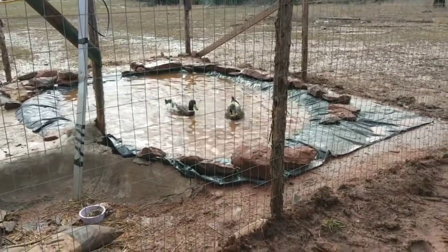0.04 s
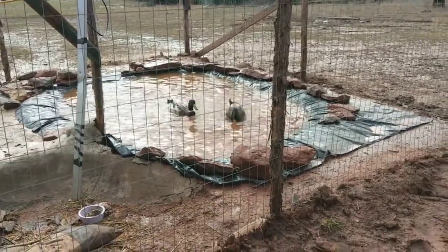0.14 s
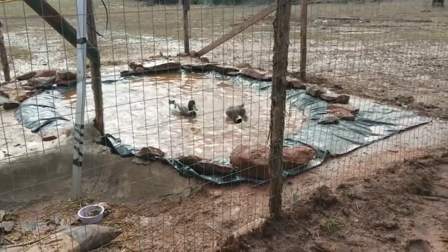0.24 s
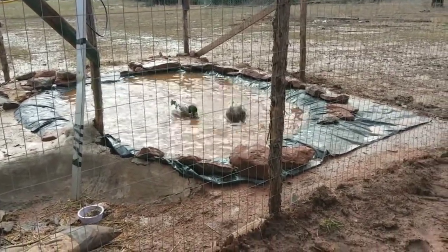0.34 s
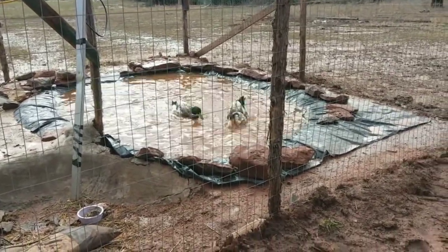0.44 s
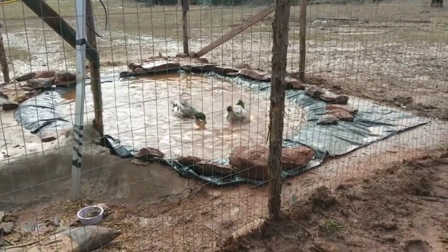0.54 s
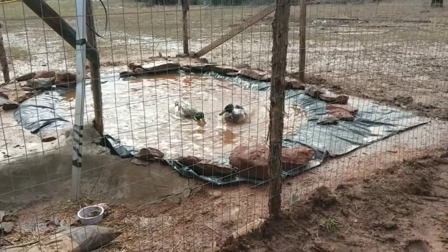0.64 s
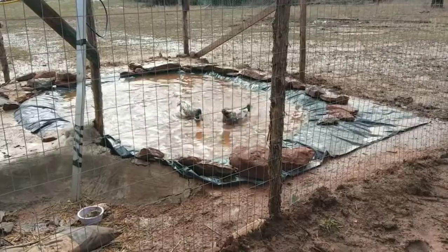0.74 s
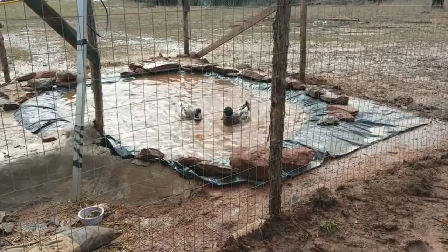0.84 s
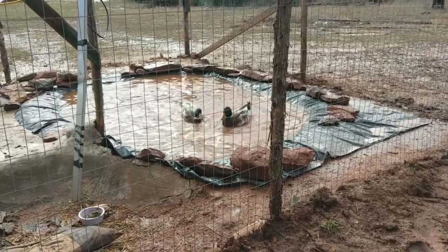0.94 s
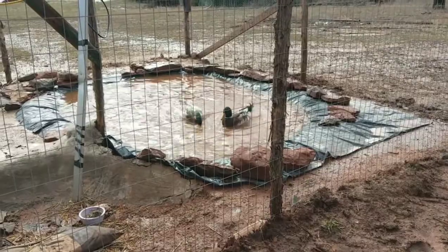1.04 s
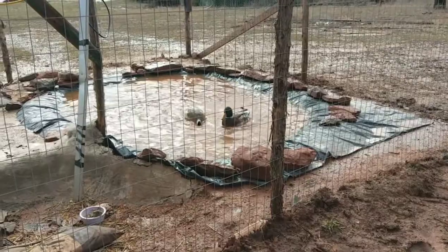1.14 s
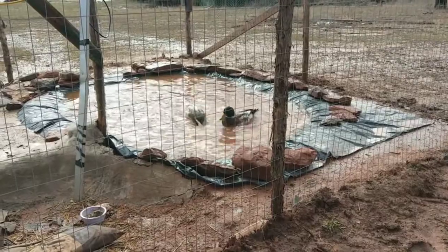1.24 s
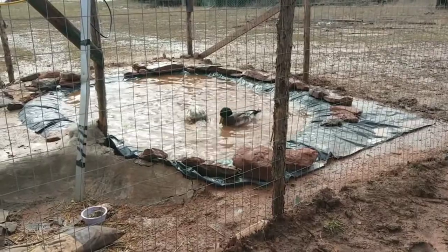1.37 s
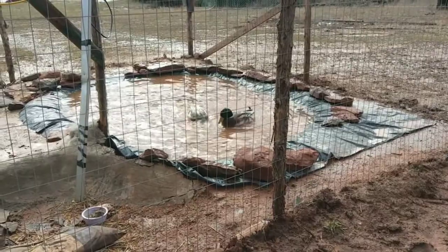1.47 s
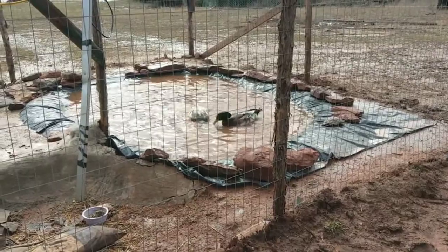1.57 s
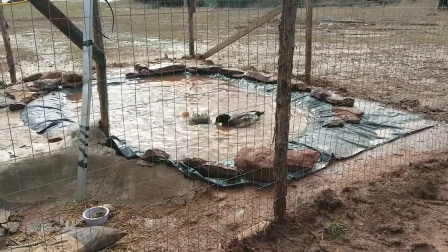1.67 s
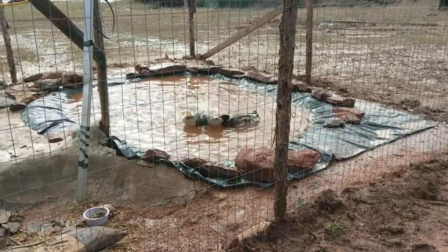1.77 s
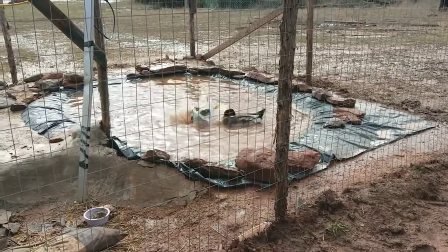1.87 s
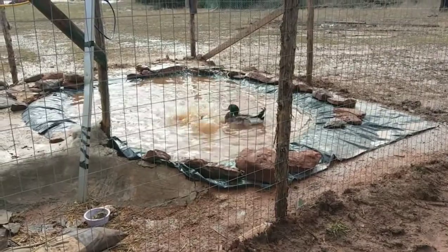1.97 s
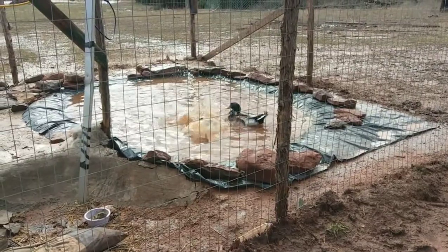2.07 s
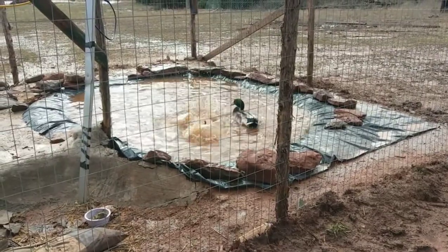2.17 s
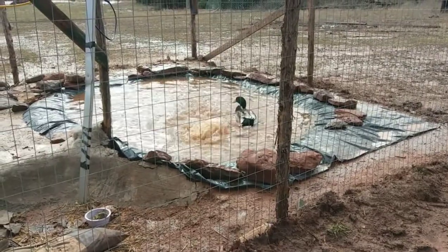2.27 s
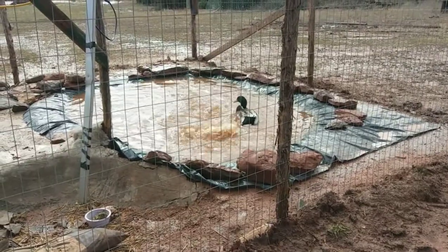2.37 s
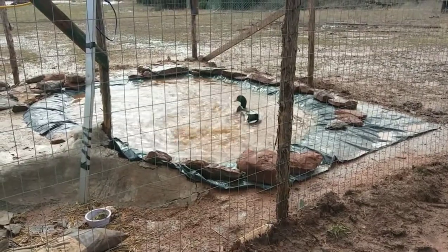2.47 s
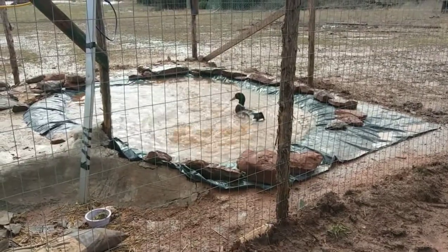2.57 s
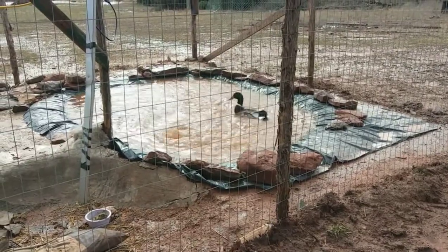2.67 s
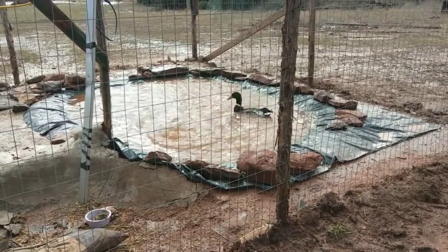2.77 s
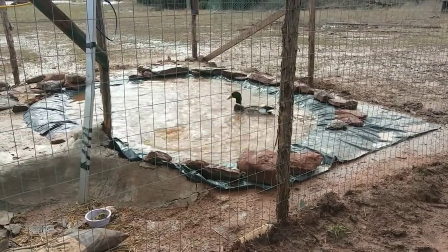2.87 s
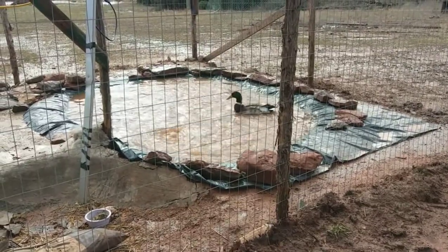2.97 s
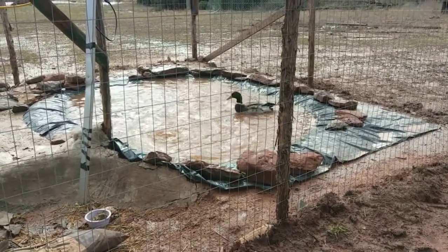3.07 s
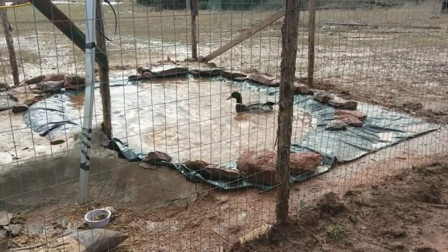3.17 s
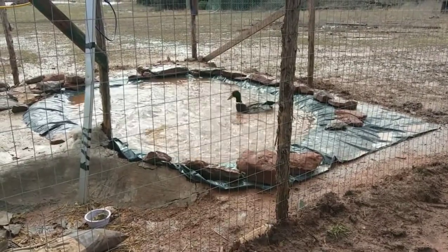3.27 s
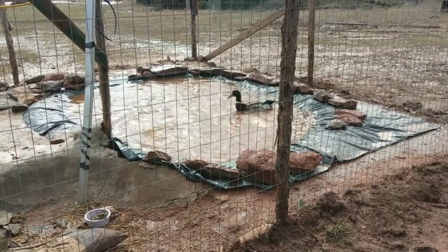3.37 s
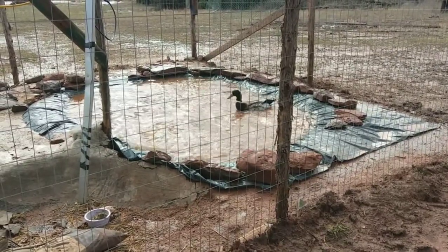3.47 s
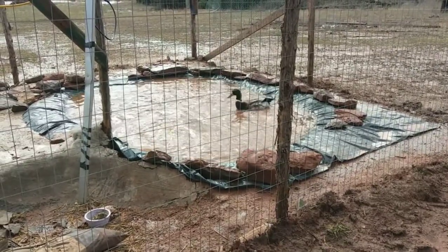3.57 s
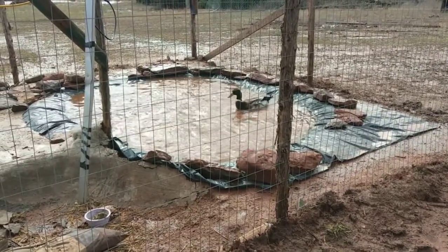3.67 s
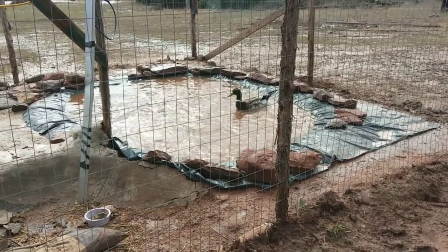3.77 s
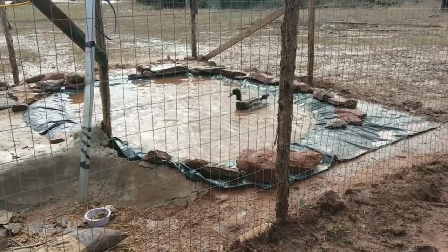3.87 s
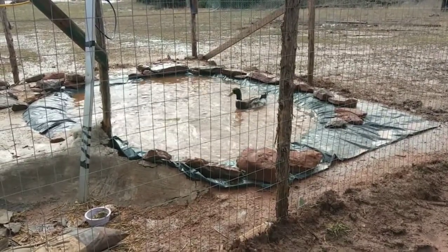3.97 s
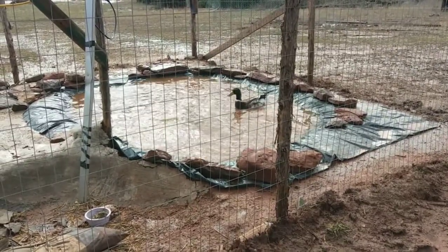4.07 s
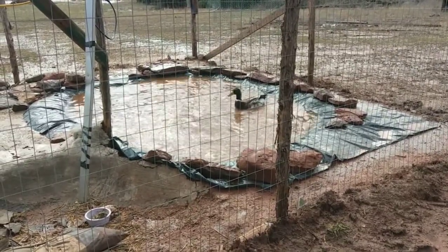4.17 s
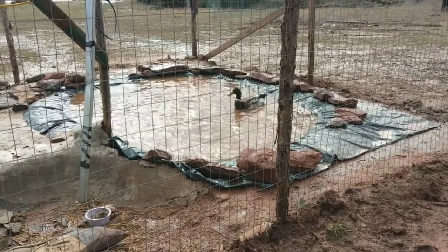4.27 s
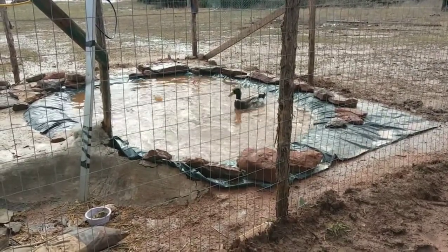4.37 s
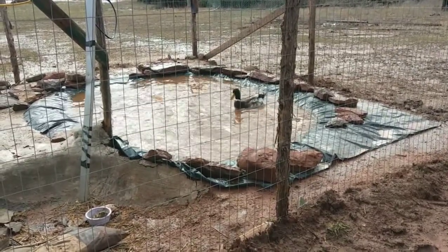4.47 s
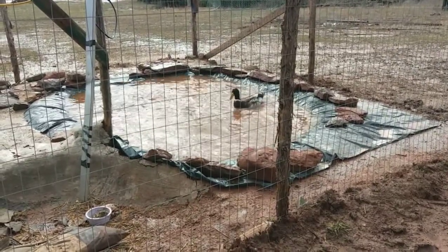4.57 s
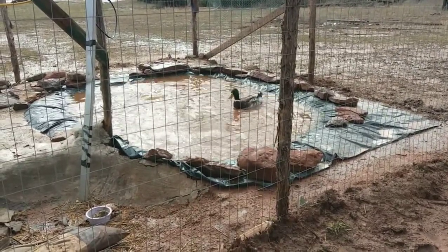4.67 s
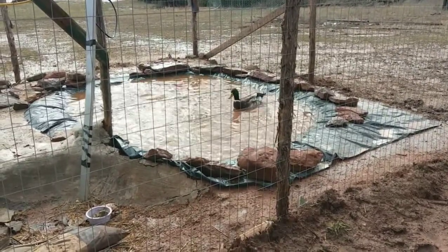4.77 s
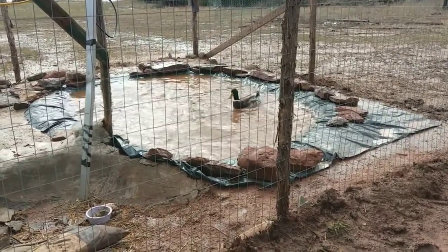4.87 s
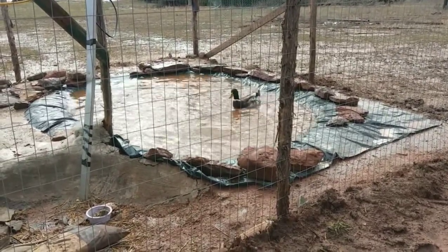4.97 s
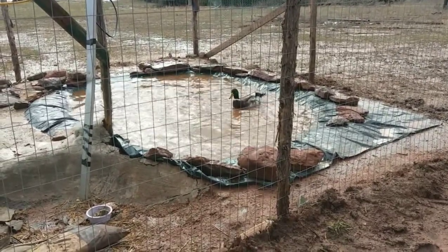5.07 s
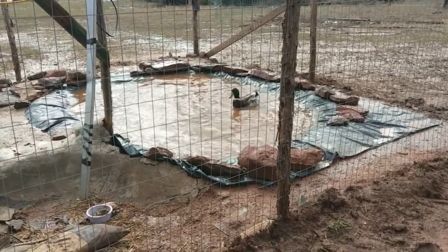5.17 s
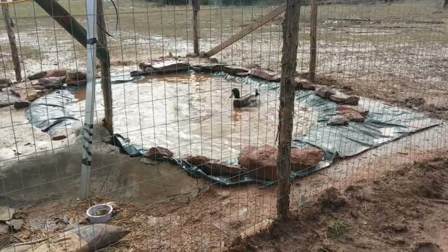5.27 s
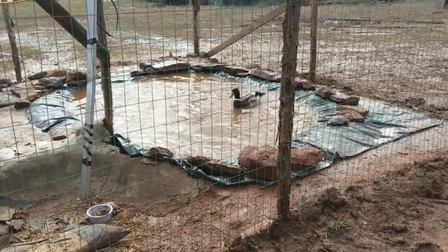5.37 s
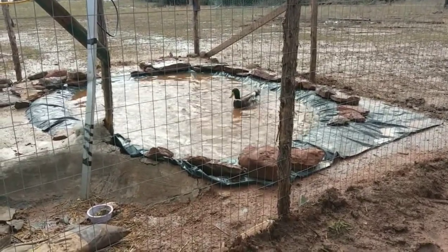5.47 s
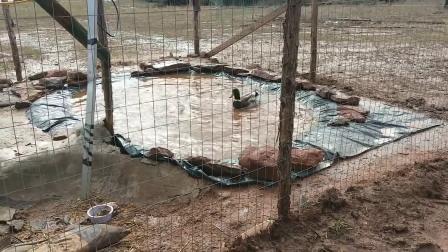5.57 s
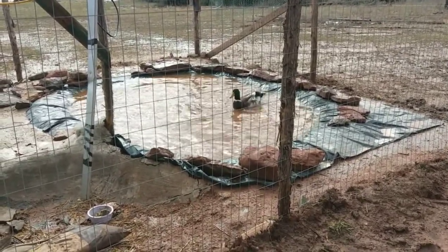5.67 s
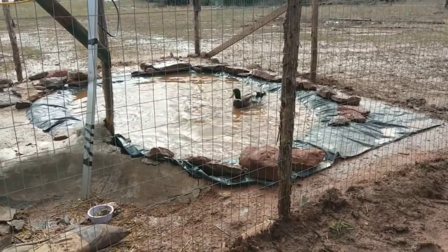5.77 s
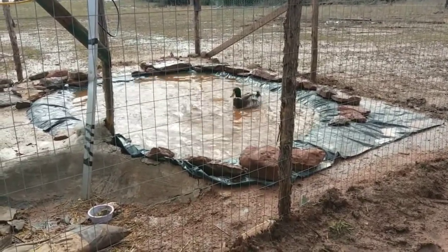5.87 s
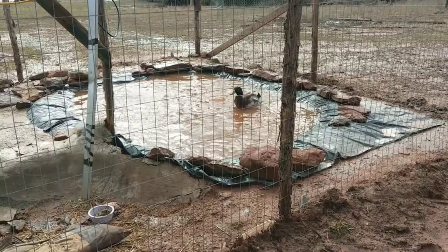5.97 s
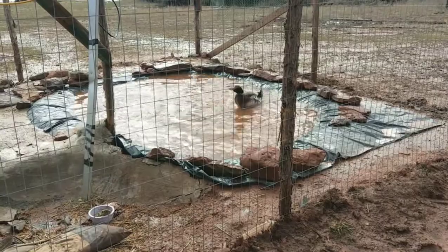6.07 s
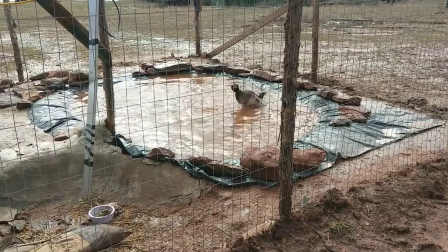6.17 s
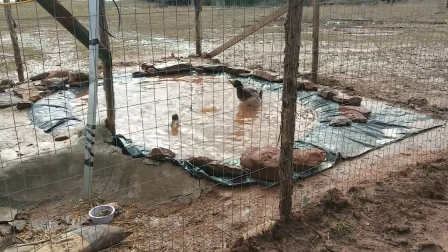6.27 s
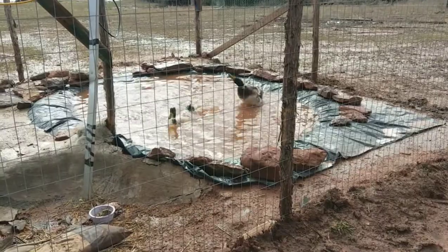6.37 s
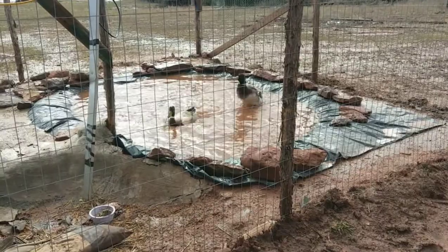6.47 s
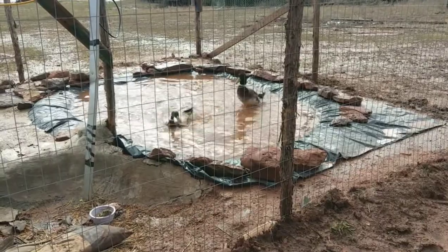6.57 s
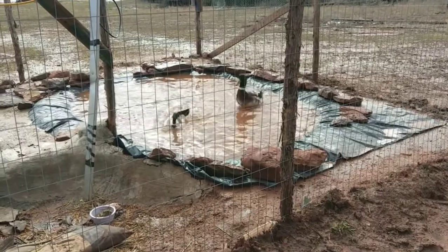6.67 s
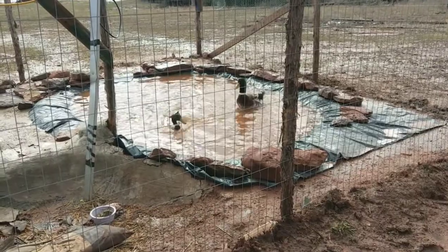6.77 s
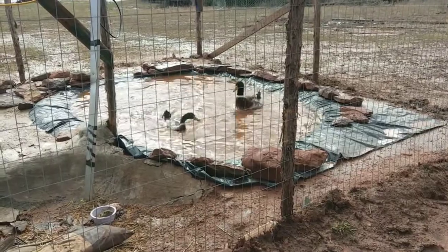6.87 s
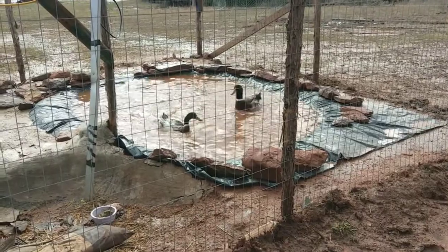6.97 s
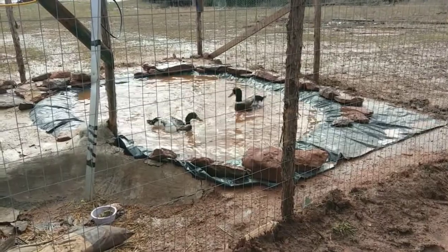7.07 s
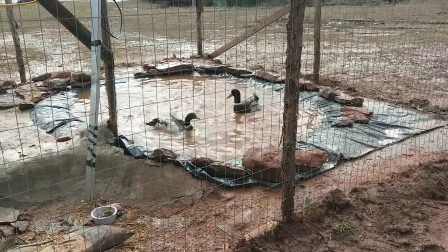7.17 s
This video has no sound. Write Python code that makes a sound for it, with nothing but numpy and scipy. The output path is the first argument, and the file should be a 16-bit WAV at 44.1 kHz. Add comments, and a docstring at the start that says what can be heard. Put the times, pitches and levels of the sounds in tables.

```python
"""Two drakes on a muddy pond

A few metres off, drakes call with raspy quacks and soft clucks: syrinx pulses and puffs ringing a throat.
One dives in a burst of wing slaps, churn and spray made of noise and bubble clouds, then surfaces.
Drips, plops and gurgles, as single bubbles and short noise bursts, fill the time between.
Wind, as low noise, bumps the microphone mostly at first, and a far bird whistles in gliding sines."""
import sys
import numpy as np
from scipy import signal
from scipy.fft import rfft, irfft, next_fast_len
from scipy.io import wavfile
from scipy.ndimage import uniform_filter1d, map_coordinates

SR = 44100
rng = np.random.default_rng(int(sys.argv[2]) if len(sys.argv) > 2 else 0)


def generate_wav(signal):
    """Clip the signal to [-1, 1] and save it as 16-bit WAV at the path in sys.argv[1]."""
    frames = np.transpose(np.atleast_2d(signal))
    scaled = np.clip(frames, -1, 1) * 32767
    pcm = np.round(scaled).astype(np.int16)
    wavfile.write(sys.argv[1], SR, pcm)


N = 319284  # length in samples

# Hush of the open field. Each row: frequency in Hz, relative density in dB per Hz.
AIR = [(60, -2.5), (110, -13.5), (180, -6), (320, -9), (500, -10), (820, -12), (1500, -17), (2200, -19),
       (3200, -25), (4800, -25), (7000, -28), (9200, -30.5), (11000, -29), (14400, -31.5)]
AIR_DB = -67
# Left-right likeness of the field. Each row: frequency in Hz, likeness (1 is identical).
AIR_ALIKE = [(100, 1), (700, 0.46), (2000, 0.11), (5000, 0.027), (12000, 0.084)]
# Breeze at the microphone, mostly dying down. Each row: time in seconds, level in dB.
WIND = [(0, -49.5), (.6, -57), (1.3, -53), (2.1, -53), (3.0, -56.5), (4.5, -64), (6.6, -64.5), (7.24, -60)]
# Wind rumble spectrum. Each row: frequency in Hz, relative density in dB per Hz.
RUMBLE = [(10, -1), (25, -2), (50, -3), (100, -10.5), (170, -20), (280, -28), (500, -36.5), (1200, -67)]
# Gusts on the microphone ports. Each row: start in seconds, half length in seconds, rumble level in dB,
# nominal peak of the sharp eddy in dB, left minus right in dB.
GUSTS = [(.009, 0.066, -46, -36.5, 10.5), (0.062, .09, -54, -40, 10), (0.15, 0.072, -43, -26.5, 6.5),
         (0.831, 0.059, -45, -37, -7.5), (0.894, .04, -43.5, -27.5, -8.5), (1.052, 0.074, -45, -29, 0),
         (1.113, 0.075, -45.5, -35, 0), (1.376, 0.019, -57, -35.5, -10), (1.696, 0.082, -50.5, -39, 4),
         (1.768, 0.046, -45.5, -35.5, 5), (1.893, 0.017, -48.5, -65, 0), (5.532, 0.016, -54, -58, 6)]
# Far bird, its slurred notes. Each row: start in seconds, length in seconds, level in dB,
# first pitch in Hz, last pitch in Hz.
WHISTLE = [(-.06, .15, -73, 2920, 2880), (.545, .19, -67.5, 3010, 2870), (.556, .079, -65.5, 2220, 2240),
           (.76, .135, -57.5, 2770, 2815), (3.65, .17, -70.5, 2850, 2930)]

# Outdoor echo. Each row: frequency in Hz, t60 in seconds.
YARD = [(200, 0.048), (1500, 0.26), (10000, 0.071)]
# Glancing echoes from rim stones, ground and posts. Each row: delay in seconds, level in dB.
BOUNCES = [(.0061, -14.5), (0.0105, -14.5), (0.0173, -16)]
# Left-right likeness of the pond. Each row: frequency in Hz, likeness (1 is identical).
POND_ALIKE = [(100, 0.91), (700, 1), (1400, 0.99), (3100, 0.76), (5000, 0.36), (7000, 0.036), (12000, 0.4)]
# The pond leans left in the treble. Each row: frequency in Hz, left minus right in dB.
LEAN = [(500, 0.5), (1300, 1), (2400, 2.5), (4400, 3), (8500, 5), (13000, 1.5)]
TOP_HZ = 14500

# Water dribbling off feathers and lapping. Each row: time in seconds, level in dB before the paddling trim.
DRIBBLING = [(0, -77.5), (1.3, -68.5), (1.9, -73.5), (3.3, -73.5), (4.5, -77), (5.7, -80), (7.24, -73.5)]
# Paddle strokes and shakes. Each row: crest in seconds, level in dB before the paddling trim,
# rise in seconds, fall in seconds.
STROKES = [(.78, -61, 0.13, 0.15), (.945, -58.5, 0.048, 0.051), (1.055, -65.5, 0.012, 0.035),
           (1.931, -63.5, 0.014, 0.048), (3.1, -62.5, 0.013, 0.17), (3.271, -59, .005, 0.018),
           (3.6, -69.5, 0.027, 0.18), (3.92, -71.5, 0.055, 0.1), (4.34, -68, 0.013, 0.013),
           (4.69, -70.5, 0.025, 0.14), (4.87, -73, 0.026, 0.027), (6.55, -66.5, 0.048, 0.31),
           (6.8, -64.5, 0.0081, 0.095), (6.95, -68.5, 0.058, 0.16)]
# Water heaved by a turning or surfacing body. Each row: start in seconds, length in seconds,
# level in dB before the slosh trim.
SLOSH = [(0.66, 0.18, -58.5), (3.57, 0.11, -66), (6.49, 0.03, -57.5), (6.82, 0.3, -65)]
SLOSH_ATTACK_S, SLOSH_RELEASE_S = 0.021, 0.046
# Spectrum of dribbling water. Each row: frequency in Hz, relative density in dB per Hz.
DRIBBLE = [(250, -19), (550, -2.5), (1300, -0.5), (2400, -3), (4200, -5.5), (6500, -9), (9200, -8.5),
           (11000, -16.5), (14000, -21)]
# Spectrum of the froth's fizz. Each row: frequency in Hz, relative density in dB per Hz.
FROTH = [(2000, -11), (4000, -4), (7000, -5), (9200, 3), (11500, -10), (14000, -2)]

# Fine drops fall back and ping. Each row: start in seconds, nominal peak in dB, pitch in Hz.
PINGS = [(.254, -55, 8900), (3.14, -42.5, 8860), (3.6, -51.5, 8440), (4.24, -50, 4330), (4.688, -57, 9100),
         (5.11, -61, 6800), (6.572, -53, 8550), (6.8, -50.5, 9000)]
# Sharp spatters. Each row: start in seconds, nominal peak in dB, t60 of the hiss in seconds.
SPATS = [(0.235, -49, 0.049), (.768, -50, .02), (0.9348, -38.5, 0.041), (0.97, -37.5, .036),
         (1.9264, -50, .04), (2.128, -41, .015), (2.26, -39, .012), (2.16, -41, .036), (2.601, -31, 0.025),
         (2.805, -36.5, 0.048), (3.099, -47, .014), (3.269, -41, 0.025), (3.856, -49.5, .03),
         (4.157, -37.5, 0.011), (4.2398, -51, 0.018), (4.867, -55, 0.022), (6.7992, -50.5, 0.039),
         (6.8172, -47, .036), (6.9934, -47.5, .03), (7.036, -49, 0.03), (7.108, -53, 0.023)]
SPAT_TICK_T60_S = 0.00081
# Spatter spectrum. Each row: frequency in Hz, relative density in dB per Hz.
SPATTER = [(800, -7), (2300, -4), (3300, 7.5), (4700, 2.5), (6000, -8), (9000, -11), (14000, -49)]
# Air pockets closing or opening. Each row: start in seconds, length in seconds, level in dB,
# first pitch in Hz, last pitch in Hz.
GURGLES = [(0.606, 0.092, -72, 1235, 1370), (0.682, 0.078, -61, 848, 1060),
           (0.909, 0.025, -49.5, 1310, 1650), (1.059, 0.018, -62.5, 1990, 2520),
           (1.108, 0.035, -62, 1160, 1680), (1.994, 0.051, -52, 1720, 597), (2.101, 0.049, -50, 157, 203),
           (2.247, 0.047, -46, 1222, 960), (2.395, 0.034, -46.5, 964, 1210),
           (2.499, 0.029, -49.5, 788, 555), (2.722, 0.052, -60, 1012, 590), (2.866, 0.037, -61, 1284, 1103),
           (4.934, 0.024, -62, 1230, 1590), (6.286, 0.039, -67, 900, 1150), (6.498, 0.025, -62.5, 680, 585),
           (6.531, 0.055, -64, 618, 1264), (6.688, 0.039, -64.5, 1010, 1220),
           (6.837, 0.026, -57, 1613, 1556), (6.846, .06, -71.5, 980, 1295),
           (6.877, 0.04, -62.5, 1195, 1580), (6.923, 0.045, -59, 1377, 1428),
           (6.961, 0.055, -58, 1403, 1170), (7.028, 0.06, -64, 1452, 1360), (7.109, 0.043, -65, 1400, 1648)]
# Single bubbles. Each row: start in seconds, nominal peak in dB, pitch in Hz, t60 in seconds.
PLOPS = [(0.588, -41, 1245, 0.073), (0.675, -35.5, 1980, 0.025), (0.679, -39.5, 2340, 0.036),
         (0.771, -39.5, 980, 0.037), (0.947, -33, 1675, 0.033), (0.981, -43.5, 1167, 0.06),
         (1.022, -39.5, 1780, 0.017), (1.087, -46, 1930, 0.027), (1.21, -52.5, 630, 0.095),
         (1.565, -51, 1430, 0.044), (1.905, -38, 1420, 0.02), (2.02, -47, 910, 0.035),
         (2.093, -30.5, 764, 0.024), (2.128, -28, 940, 0.028), (2.511, -24, 923, 0.03),
         (2.572, -32, 669, .05), (2.62, -31, 647, 0.056), (2.757, -33, 513, 0.087),
         (2.974, -43.5, 880, 0.085), (2.976, -51, 496, 0.1), (3.009, -42.5, 472, 0.042),
         (3.099, -39, 1100, 0.017), (3.178, -39, 1530, 0.048), (3.385, -39.5, 1140, 0.036),
         (3.402, -45, 1282, 0.064), (3.583, -51.5, 2430, 0.061), (3.648, -45, 1130, 0.021),
         (3.889, -42.5, 2860, 0.022), (4.291, -40.5, 2010, 0.053), (4.744, -51.5, 1163, 0.071),
         (4.783, -47, 1060, 0.035), (4.824, -41.5, 1830, 0.018), (4.961, -50, 2150, 0.021),
         (6.03, -57, 2480, 0.038), (6.06, -52, 2026, 0.053), (6.065, -50, 1030, 0.06),
         (6.119, -54, 2100, 0.03), (6.491, -42, 1696, 0.065), (6.674, -45, 1190, 0.045),
         (6.963, -35.5, 2020, 0.035), (7.075, -41.5, 1930, 0.053), (7.221, -43, 1540, 0.037)]
PLOP_RISE = 0.083  # share by which the pitch climbs in one t60
# Air driven under by wings and body. Each row: start in seconds, nominal peak in dB, first pitch in Hz.
THUMPS = [(1.993, -50, 167), (2.057, -43, 245), (2.157, -40.5, 246), (2.202, -53, 200), (2.289, -47.5, 314),
          (2.412, -44.5, 272), (2.605, -50, 373), (2.755, -50, 163)]
THUMP_ATTACK_S, THUMP_T60_S, THUMP_RISE = .005, .14, .06

# Wings and feet striking the water. Each row: start in seconds, nominal peak in dB, cavity pitch in Hz,
# thrown spray in dB.
SLAPS = [(0.912, -37.5, 1380, -79), (1.992, -30, 1750, -45.5), (2.055, -33.5, 1460, -49),
         (2.157, -26.5, 905, -44.5), (2.202, -37.5, 1330, -50.5), (2.241, -31, 1260, -64),
         (2.283, -33, 1020, -65), (2.413, -31, 1420, -62), (2.433, -30, 1250, -53),
         (2.502, -27.5, 895, -47), (2.568, -29, 1260, -63), (2.613, -26, 1650, -54),
         (2.628, -26, 920, -43.5), (2.712, -41, 1390, -49.5), (2.762, -33.5, 1500, -55),
         (2.832, -33.5, 1860, -62), (3.156, -41.5, 1270, -79)]
SLAP_T60_S = 0.085
# Each slap stirs a brief surge of churn; dB relative to the slap's nominal peak.
SURGE_RISE_S, SURGE_FALL_S, SURGE_DB = 0.0028, 0.0098, -24
# How hard the diving duck churns the water. Each row: time in seconds, level in dB before churn and spray trims.
THRASH = [(2.0, -59), (2.048, -54.5), (2.068, -45), (2.115, -49.5), (2.15, -47.5), (2.19, -49.5),
          (2.25, -45.5), (2.34, -49), (2.39, -45), (2.44, -41), (2.49, -44), (2.53, -42), (2.595, -41),
          (2.635, -40), (2.675, -44.5), (2.73, -41), (2.79, -52), (2.86, -52), (2.93, -58.5), (3.17, -63)]
SPRAY_DB = -8.5  # steady spray relative to the thrash level
# Churn spectrum. Each row: frequency in Hz, relative density in dB per Hz.
CHURN = [(120, -52), (200, -29), (280, -3), (370, -10.5), (480, -5.5), (660, -6.5), (880, -2.5),
         (1200, -1.5), (1750, -4), (2000, 0), (2650, -14), (5000, -10), (7000, -36)]
# Spray spectrum. Each row: frequency in Hz, relative density in dB per Hz.
SPRAY = [(1500, -17), (2800, -3.5), (4400, -5), (6500, -7.5), (9200, -6.5), (11500, -15), (12500, -21),
         (14000, -48)]

# The bill snaps open about the start of a quack. Each row: start in seconds, nominal peak in dB,
# cavity pitch in Hz.
BILL_SNAPS = [(.251, -36, 1080), (3.416, -39, 830), (4.077, -42.5, 870), (4.866, -48, 850),
              (7.195, -47, 801.6)]
SNAP_T60_S = .04
# Open-billed quacks. Each row: start in seconds, length in seconds, level in dB before the voice trim,
# gape as a factor on pitch and resonances, treble in dB with the bill open.
QUACKS = [(0.0, 0.032, -61, 0.9, 0), (0.251, 0.078, -55, 0.93, -2.5), (0.687, .046, -58.5, 0.83, 3),
          (0.744, 0.027, -56, 0.96, -14), (0.912, 0.037, -58, 0.93, 2), (3.165, 0.073, -55, 0.97, -3),
          (3.425, 0.061, -55.5, 1, -1), (3.737, 0.025, -64.5, 1.12, 1), (4.085, 0.071, -65.5, 1.0, 6.5),
          (4.809, 0.024, -67, 0.87, 11), (4.872, 0.064, -64.5, .96, 7), (6.606, 0.057, -64, 0.78, -6),
          (6.917, 0.023, -58.5, 1.14, -8), (6.966, 0.028, -60.5, 1.13, -2), (7.039, 0.052, -59, 1.06, 4),
          (7.195, 0.099, -60.5, 0.91, -14)]
# Soft clucks. Each row: start in seconds, length in seconds, level in dB before the voice trim, gape factor.
CLUCKS = [(5.664, 0.035, -54.5, 1.06), (5.95, 0.029, -63.5, 0.95), (6.218, 0.0362, -58.5, .92),
          (6.282, 0.024, -62, 0.88)]
# Throat resonances of a quack, before gape. Each row: centre in Hz, width in Hz, level in dB.
OPEN_BILL = [(900, 240, -20), (1380, 165, -0.5), (1674, 58, 5.5), (1930, 270, -1.5), (2430, 67, 0.5),
             (3200, 800, -14.5), (3980, 210, -9.5), (4700, 1600, -20.5)]
# Throat resonances of a cluck, before gape. Each row: centre in Hz, width in Hz, level in dB.
CLOSED_BILL = [(555, 82, -7), (880, 50, 2.5), (1040, 110, -2.5), (1197, 92, 4), (1840, 100, -6.5),
               (2300, 140, -13.5)]
CALL_ATTACK_S, CALL_RELEASE_S, CLUCK_SWELL_S = 0.0058, 0.015, .026
# A thin hoot of two partials leads into each cluck.
HOOT_HZ, HOOT_DB, HOOT_LEAD_S, HOOT_HOLD_S = 782, -64, 0.028, 0.04
# The hissing resonance: pitch before gape, width, share by which it arches, level relative to the quack row.
RASP_HZ, RASP_WIDTH_HZ, RASP_ARCH, RASP_DB = 3600, 330, .35, -13.5


def amp(db):
    """Decibels to gain."""
    return 10 ** (np.asarray(db) / 20)


def unit(x):
    """Scale to rms 1."""
    return x / np.sqrt(np.mean(x ** 2) + 1e-20)


def evened(x, size):
    """Hold x near rms 1 over every stretch of size samples."""
    return x / np.sqrt(np.abs(uniform_filter1d(x ** 2, size=size)) + 1e-12)


def along(points, hz):
    """Interpolate (Hz, value) points on a log frequency axis."""
    f, v = np.transpose(points)
    return np.interp(np.log(hz + 1), np.log(f + 1), v)


def clock(seconds):
    """Sample times from zero."""
    return np.arange(int(seconds * SR)) / SR


def level(rows, axis=1, fade=0.0032):
    """Gain per sample from a dB column, fading out beyond its ends."""
    rows, t = np.array(rows), np.arange(N) / SR
    outside = np.maximum(0, np.maximum(rows[0, 0] - t, t - rows[-1, 0]))
    return amp(np.interp(t, rows[:, 0], rows[:, axis])) * np.exp(-(outside / fade) ** 2)


def held(s, length, attack, release):
    """Gain that rises from time s, holds to the end of its length and dies away."""
    t = np.arange(N) / SR - s
    return np.clip(t / attack, 0, 1) * np.exp(-np.clip((t - length) / release, 0, 20))


def crest(s, rise, fall):
    """Gain that swells to 1 at time s and ebbs again."""
    t = np.arange(N) / SR - s
    return np.exp(-np.minimum(np.maximum(-t / rise, t / fall), 20))


def add(track, s, sound):
    """Mix a sound in at time s."""
    room = track[max(0, round(s * SR)):][:len(sound)]
    room += sound[:len(room)]


def wobble(rate):
    """A smooth random curve, rate knots a second."""
    knots = rng.standard_normal(int(N * rate / SR) + 4)
    return map_coordinates(knots, [np.arange(N) * rate / SR])


def filtered(x, response):
    """Filter x by a complex response of frequency."""
    n = x.shape[-1]
    m = next_fast_len(n + 8192)
    return irfft(rfft(x, m) * response(np.fft.rfftfreq(m, 1 / SR)), m)[..., :n]


def coloured(x, spectrum):
    """Shape x by the given spectrum, at rms 1."""
    return unit(filtered(x, lambda hz: amp(along(spectrum, hz))))


def noise_pair():
    """Two unrelated white noises."""
    return rng.standard_normal((2, N))


def spread(pair, alike):
    """Turn two unrelated signals into left and right of the given likeness."""
    turn = lambda hz: np.arccos(np.clip(along(alike, hz), -1, 1)) / 2
    mid, side = filtered(pair, lambda hz: np.array([np.cos(turn(hz)), np.sin(turn(hz))]))
    return np.array([mid + side, mid - side])


def bubbles(rate, low_hz, high_hz, cycles, scatter_db, size=600):
    """A cloud of damped, rising sines of even spectrum and rms 1; rate in bubbles a second."""
    when, pitch, strength, life = rng.random((int(rate * N / SR), 4)).T[:, :, None]
    hz = low_hz * (high_hz / low_hz) ** pitch
    t = np.arange(size) / SR
    age = t * hz / (cycles * (.5 + life))
    gain = amp(-scatter_db * np.log(np.maximum(strength, np.exp(-4)))) * np.sqrt(hz)
    ringing = np.sin(2 * np.pi * hz * t * (1 + 0.028 * age)) * np.exp(-age)
    grains = gain * ringing * (1 - t / t[-1])
    places = (when * N).astype(int) + np.arange(size)
    return unit(np.bincount(places.ravel(), grains.ravel(), N)[:N])


def bubble_pair(*args, **settings):
    """Two unrelated bubble clouds."""
    return np.array([bubbles(*args, **settings) for _ in range(2)])


def air():
    """The quiet hush of open farmland, as wide shaped noise that wavers slowly."""
    return amp(AIR_DB + 0.92 * wobble(3.587)) * spread(coloured(noise_pair(), AIR), AIR_ALIKE)


def wind(swell=0.01, eddy_hz=95, eddy_top_hz=285):
    """Low turbulence on both ports; a gust may strike one harder and sheds an eddy that reaches higher."""
    steady = evened(coloured(noise_pair(), RUMBLE), size=3500)
    rumble = spread(steady, [(30, 0.71), (150, 0.69)])
    flow = level(WIND) * amp(3.0 * wobble(14))
    shedding, t = np.zeros((2, N)), np.arange(N) / SR
    for s, half_length, rumble_db, eddy_db, lean_db in GUSTS:
        ports = amp(lean_db * np.array([[.5], [-.5]]))
        gust = np.exp(-np.minimum(((t - s - swell) / half_length) ** 2, 20))
        flow = np.hypot(flow, ports * amp(rumble_db) * gust)
        age = np.clip((t - s) / swell, 0, 20)
        shedding += ports * amp(eddy_db - 9) * (age * np.exp(1 - age)) ** 2

    def eddy_response(f):
        """A low hump with a steep upper slope."""
        r = f / eddy_hz
        return r ** 2 / (1 + r ** 3.42) / (1 + (f / eddy_top_hz) ** 4)

    eddies = evened(filtered(noise_pair(), eddy_response), size=900)
    return rumble * flow + shedding * spread(eddies, [(100, 0.71)])


def bird():
    """Thin, wavering whistles from far off, each a sine gliding between two pitches."""
    flutter = 1 + .005 * wobble(200)
    tremor = unit(np.abs(1 + .45 * wobble(70)))
    out = np.zeros(N)
    for s, length, db, first_hz, last_hz in WHISTLE:
        u = np.clip((np.arange(N) / SR - s) / length, 0, 1)
        pitch = (first_hz + (last_hz - first_hz) * u) * flutter
        out += amp(db) * np.sin(np.pi * u) * np.sin(2 * np.pi * np.cumsum(pitch) / SR)
    return out * tremor


def scattered(x, t60=0.0017):
    """The fence and bank scatter a sound into a brief, unrelated copy."""
    t = clock(.02)
    smear = rng.standard_normal(len(t)) * amp(-60 * t / t60)
    return signal.fftconvolve(x, smear / np.linalg.norm(smear))[:N]


def bounced(x):
    """The direct sound plus its glancing echoes, which lose treble."""
    def response(f):
        echoes = sum(amp(db) * np.exp(-2j * np.pi * f * s) for s, db in BOUNCES)
        return 1 + echoes / (1 + 1j * f / 4000)

    return filtered(x, response)


def yard(x):
    """An outdoor echo of decaying noise, with its own decay time at each frequency."""
    hz, t, z = signal.stft(rng.standard_normal((2, SR // 2)), SR, nperseg=256)
    tail = signal.istft(z * amp(-60 * t / along(YARD, hz)[:, None]), SR, nperseg=256)[1]
    return signal.fftconvolve(x, tail / np.linalg.norm(tail[0]), axes=1)[:, :N]


def foam(start=2.56, db=-66, t60=6.6):
    """The froth of the dive swells up, then fizzes away as tiny popping bubbles."""
    t = np.arange(N) / SR - start
    pops = bubble_pair(2500, 2860, 12100, cycles=6.7, scatter_db=1.0, size=150)
    fizz = coloured(pops, FROTH)
    return fizz * amp(db - 60 * np.abs(t) / t60) * np.clip(1 + t / 0.43, 0, 1)


def paddling():
    """Droplets and small bubbles over a thin wash; longer-ringing bubbles where a body heaves the water."""
    drops = bubble_pair(600, 375.0, 12720, cycles=7, scatter_db=4.1)
    water = coloured(drops + 1.25 * noise_pair(), DRIBBLE)
    burble = bubble_pair(630, 711, 2255, cycles=32, scatter_db=0.5, size=1000)
    slosh = burble + .5 * coloured(noise_pair(), CHURN)
    strokes = sum(amp(db) * crest(s, rise, fall) for s, db, rise, fall in STROKES)
    stirring = np.hypot(level(DRIBBLING), strokes)
    heaving = sum(amp(db) * held(s, length, SLOSH_ATTACK_S, SLOSH_RELEASE_S) for s, length, db in SLOSH)
    return amp(2.5) * water * stirring + amp(-8.0) * slosh * heaving


def pings(width_hz=450, t60=0.037):
    """A falling drop sets tiny bubbles ringing in one narrow, high band."""
    out, t = np.zeros(N), clock(.1)
    for s, db, hz in PINGS:
        ring = filtered(rng.standard_normal(len(t)), lambda f: 1 / (1 + ((f - hz) / width_hz) ** 2))
        add(out, s, amp(db - 7 - 60 * t / t60) * unit(ring))
    return out


def spats(tick_db=-3, hiss_db=-10):
    """Thrown drops hit the surface: a bright tick, then a short hiss."""
    out, t = np.zeros(N), clock(0.068)
    for s, db, t60 in SPATS:
        burst = amp(tick_db - 60 * t / SPAT_TICK_T60_S) + amp(hiss_db - 60 * t / t60)
        add(out, s, amp(db) * burst * coloured(rng.standard_normal(len(t)), SPATTER))
    return out


def fuzzy(phase, width_hz):
    """Noise in a band around a gliding pitch, from two slow noises on its sine and cosine."""
    slow = filtered(rng.standard_normal((2, SR // 4)), lambda f: 1 / (1 + (f / width_hz) ** 2))
    a, b = slow[:, :len(phase)]
    return unit(a * np.sin(phase) + b * np.cos(phase))


def gurgles(width_hz=70):
    """An air pocket, stirred by the water, sounds a fuzzy note that glides as its size changes."""
    out = np.zeros(N)
    for s, length, db, first_hz, last_hz in GURGLES:
        u = clock(length) / length
        phase = 2 * np.pi * np.cumsum(first_hz * (last_hz / first_hz) ** u) / SR
        note = np.sin(phase) + 0.71 * fuzzy(phase, width_hz)
        add(out, s, amp(db) * unit(note * np.sqrt(u) * (1 - u)))
    return out


def plops(attack=0.00053):
    """A trapped bubble rings and rises in pitch as it nears the surface."""
    out, t = np.zeros(N), clock(.12)
    for s, db, hz, t60 in PLOPS:
        phase = np.cumsum(hz * (1 + PLOP_RISE * (t / t60 - .12))) / SR
        decay = amp(db - 4.0 - 60 * t / t60)
        add(out, s, decay * np.sin(2 * np.pi * phase) * (1 - np.exp(-t / attack)))
    return out


def thumps():
    """The body drives air deep under the surface, where it booms briefly."""
    out, t = np.zeros(N), clock(.2)
    for s, db, hz in THUMPS:
        phase = np.cumsum(hz * (1 + THUMP_RISE * t / THUMP_T60_S)) / SR
        decay = amp(db - 60 * t / THUMP_T60_S)
        add(out, s, decay * np.sin(2 * np.pi * phase) * (1 - np.exp(-t / THUMP_ATTACK_S)))
    return out


def slaps(strokes, attack, t60, ring=2.2, width=0.51):
    """Each stroke bursts as broad noise, strongest around the pitch of the cavity it opens."""
    out, t = np.zeros(N), clock(0.16)
    broad = lambda r: r ** 2 / (1 + r ** 3.87)
    cavity = lambda r: 1 + ring / (1 + ((r - 1) / width) ** 2)
    for s, db, cavity_hz, *_ in strokes:
        burst = filtered(rng.standard_normal(len(t)), lambda f: broad(f / cavity_hz) * cavity(f / cavity_hz))
        add(out, s, amp(db - 9.5 - 60 * t / t60) * unit(burst) * (1 - np.exp(-t / attack)))
    return out


def dive():
    """Thrashing wings churn in air that rings as a bubble cloud, and throw spray; both surge at each slap."""
    cloud = bubble_pair(1200, 427.6, 5024, cycles=6, scatter_db=2.6, size=1000)
    churn = coloured(cloud + .35 * noise_pair(), CHURN)
    drops = bubble_pair(3500, 1830, 15600, cycles=2.3, scatter_db=1.5, size=120)
    spray = coloured(drops + .7 * noise_pair(), SPRAY)
    thrash = level(THRASH) * amp(0.57 * wobble(45))
    churning, spraying = amp(-0.5) * thrash, amp(SPRAY_DB) * thrash
    for s, db, _, spray_db in SLAPS:
        surge = held(s, 2 * SURGE_RISE_S, SURGE_RISE_S, SURGE_FALL_S)
        churning = np.hypot(churning, amp(db + SURGE_DB) * surge)
        spraying = np.hypot(spraying, amp(spray_db) * surge)
    return churn * churning + spray * spraying


def voice(calls, throat, pulse_hz, jitter, rasp, scatter_db, low_hz, drift, attack):
    """Uneven syrinx pulses, each with a puff of turbulence, ring the throat; rasp is the puffs' share."""
    phase = np.cumsum(pulse_hz * np.exp(jitter * wobble(110))) / SR
    pulses = unit(np.diff(np.floor(phase), prepend=0))
    puffs = unit(rng.standard_normal(N) * np.exp(-2.1 * (phase % 1)))
    share = np.clip(rasp, 0, 1)
    source = np.sqrt(1 - share) * pulses + np.sqrt(share) * puffs
    source = source * amp(scatter_db * wobble(120))

    def tract(f):
        """Resonances side by side, with alternating sign."""
        return sum((-1) ** k * amp(db) * 1j * f * w / (c * c - f * f + 1j * f * w)
                   for k, (c, w, db) in enumerate(throat))

    rolloff = lambda f: (1j * f / (1j * f + low_hz)) ** 2 / (1 + 1j * f / 5000) ** 2
    sound = filtered(source, lambda f: tract(f) * rolloff(f))
    # the bill opens and closes within each call, lifting pitch and resonances
    starts, lengths, _, gapes, *_ = np.transpose(calls)
    times = starts[:, None] + np.outer(lengths, [0, .5, 1])
    lifts = np.outer(gapes, [1 - drift, 1 + drift / 2, 1 - drift])
    speed = np.interp(np.arange(N) / SR, np.sort(times.ravel()), lifts.ravel())
    sound = map_coordinates(sound, [np.cumsum(speed)], mode="mirror")
    effort = sum(amp(db) * held(s, length, attack, CALL_RELEASE_S) for s, length, db, *_ in calls)
    return effort * evened(sound, size=1500)


def gaping(x, edge_hz=2700, shut_db=-8):
    """The upper resonances get out more in the middle of a quack, while the bill stands open."""
    treble = filtered(x, lambda f: 1 / (1 + (edge_hz / (f + 1)) ** 10))
    opening = sum(amp(db) * held(s + length / 10, length / 2, CALL_ATTACK_S, CALL_RELEASE_S)
                  for s, length, _, _, db in QUACKS)
    return x - treble + treble * np.hypot(amp(shut_db), opening)


def bill_hiss():
    """A hissing upper resonance arches up and down as the bill opens and shuts."""
    out = np.zeros(N)
    for s, length, db, gape, treble_db in QUACKS:
        span = length + CALL_RELEASE_S / 2
        opening = np.sin(np.pi * clock(span) / span)
        phase = 2 * np.pi * np.cumsum(gape * RASP_HZ * (1 - RASP_ARCH * (1 - opening))) / SR
        gain = amp(db + RASP_DB + min(treble_db, 0))
        add(out, s, gain * np.sqrt(opening) * fuzzy(phase, RASP_WIDTH_HZ))
    return out


def hoots():
    """A thin, wavering note of two partials swells in ahead of each cluck."""
    phase = 2 * np.pi * np.cumsum(HOOT_HZ * (1 + 0.01225 * wobble(33))) / SR
    hoot = np.sin(phase) + 0.81 * np.sin(1.54 * phase)
    hooting = sum(held(s - HOOT_LEAD_S, HOOT_HOLD_S, CLUCK_SWELL_S, CALL_RELEASE_S) for s, *_ in CLUCKS)
    return amp(HOOT_DB) * hoot * hooting


def drakes():
    """Slow rattling pulses make a quack; a cluck starts as a thin hoot and swells into quicker ones."""
    quacks = voice(QUACKS, OPEN_BILL, pulse_hz=88.7, jitter=.085, rasp=.55, scatter_db=1.6,
                   low_hz=350, drift=0.1, attack=CALL_ATTACK_S)
    clucks = voice(CLUCKS, CLOSED_BILL, pulse_hz=255.3, jitter=.11, rasp=.5, scatter_db=3.0,
                   low_hz=300, drift=0.07, attack=CLUCK_SWELL_S)
    return amp(0.5) * gaping(quacks) + bill_hiss() + amp(-0.5) * clucks + hoots()


def scene():
    """The pond a few metres ahead of the microphone, with wind and field around."""
    calls = drakes() + slaps(BILL_SNAPS, attack=0.0002, t60=SNAP_T60_S) + bird()
    strikes = slaps(SLAPS, attack=0.00064, t60=SLAP_T60_S) + thumps()
    drips = plops() + gurgles() + spats() + pings()
    points = calls + strikes + drips
    pair = np.array([points, scattered(points)]) + dive() + paddling() + foam()
    pond = bounced(spread(pair, POND_ALIKE))
    pond = filtered(pond, lambda hz: amp(np.outer([.5, -.5], along(LEAN, hz))))
    return pond + amp(-16.5) * yard(pond) + wind() + air()


def record(dry):
    """The microphone chain keeps nothing above its band limit."""
    return filtered(dry, lambda hz: hz < TOP_HZ)


dry = scene()
out = record(dry)
generate_wav(out)
```